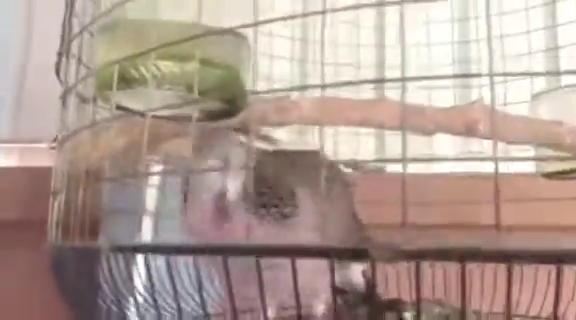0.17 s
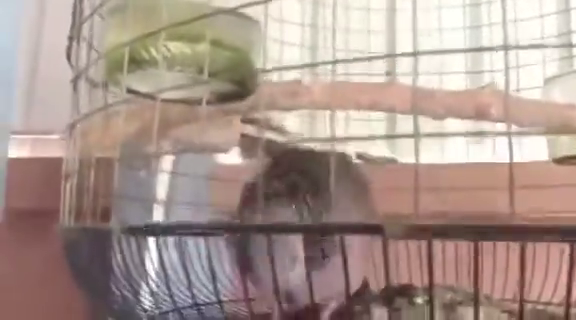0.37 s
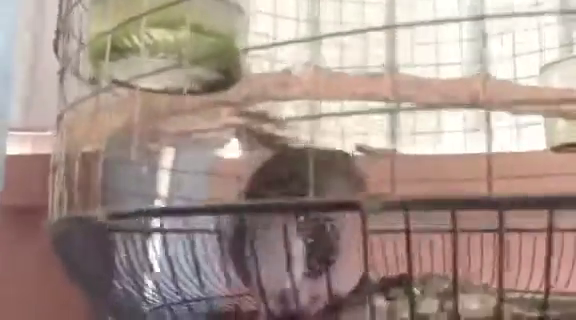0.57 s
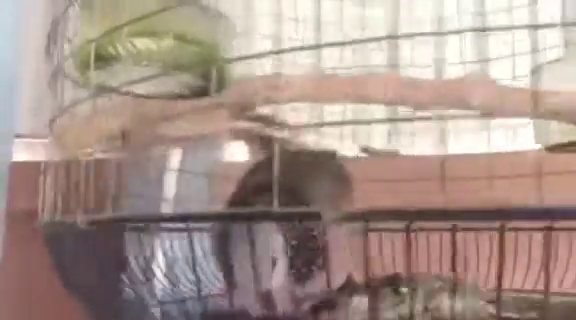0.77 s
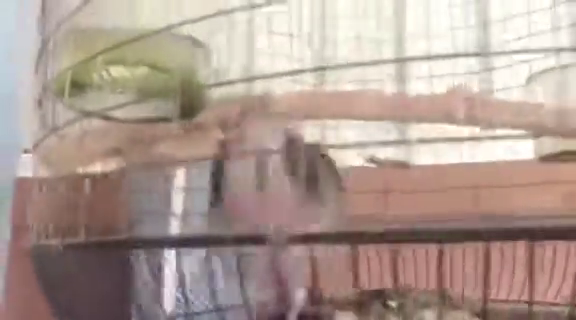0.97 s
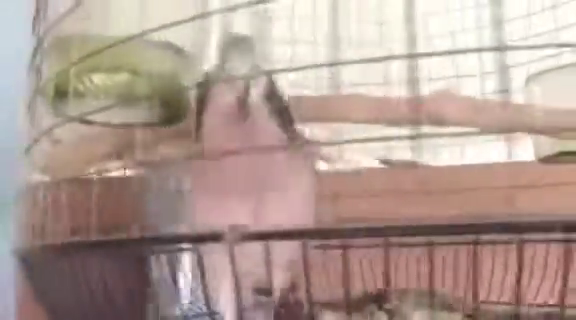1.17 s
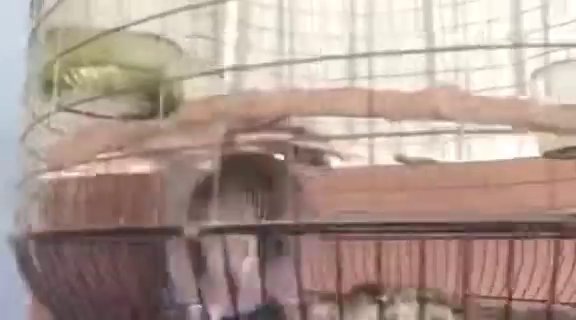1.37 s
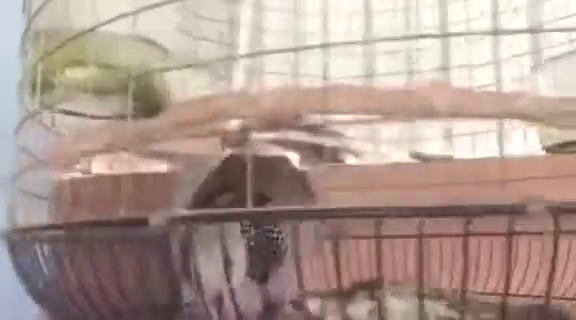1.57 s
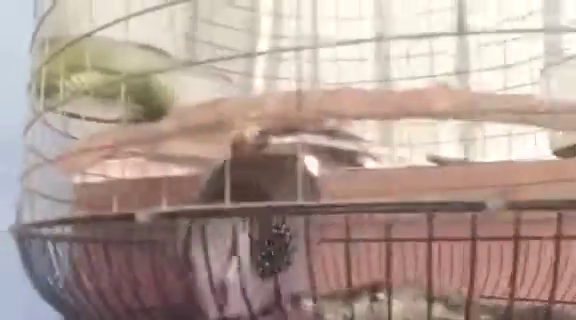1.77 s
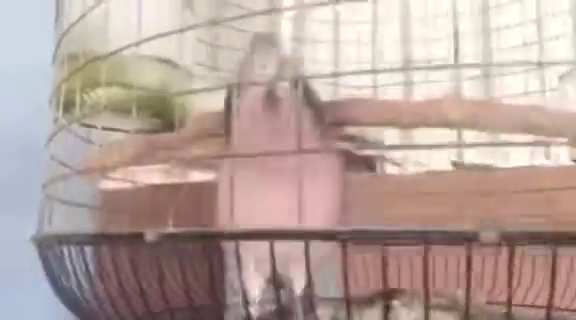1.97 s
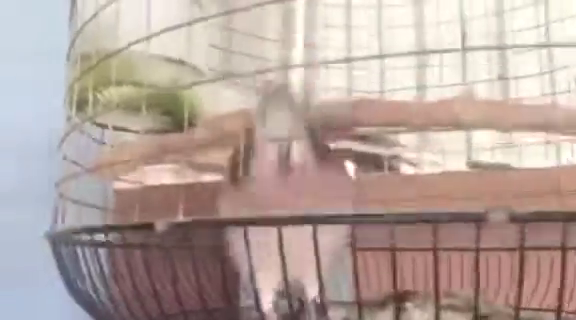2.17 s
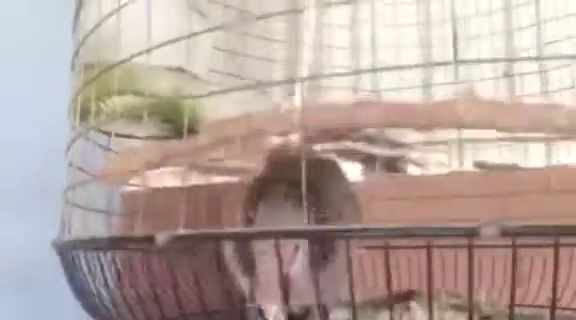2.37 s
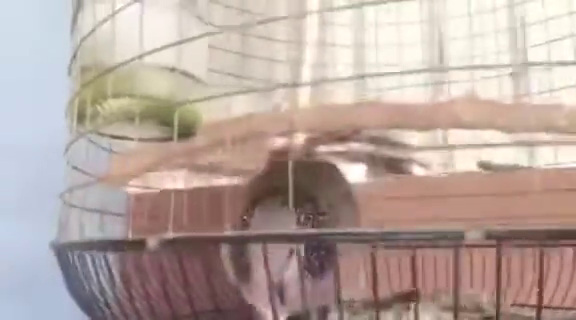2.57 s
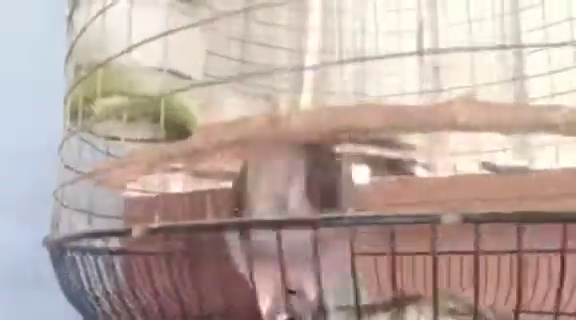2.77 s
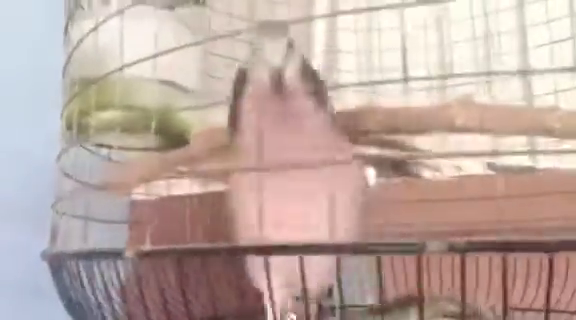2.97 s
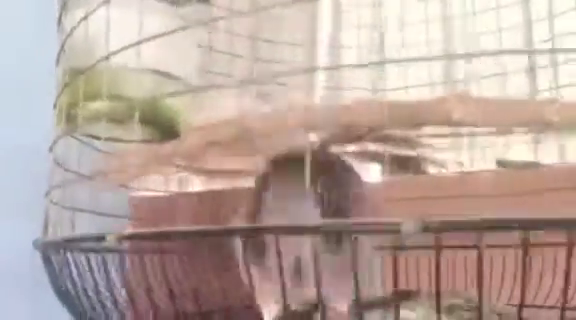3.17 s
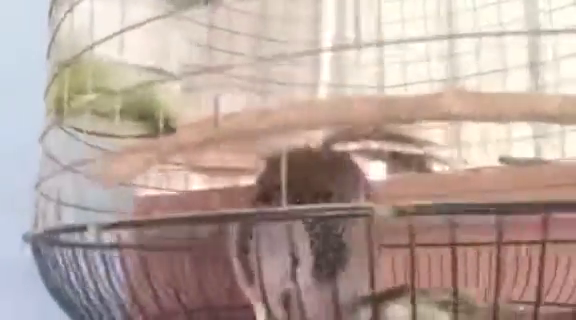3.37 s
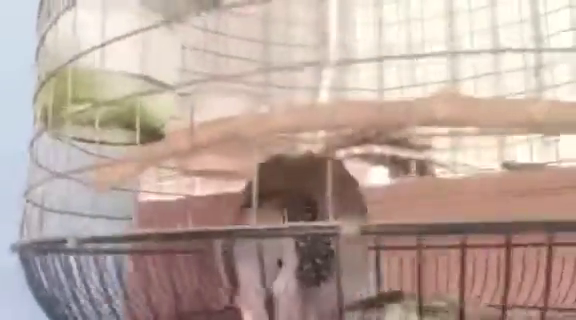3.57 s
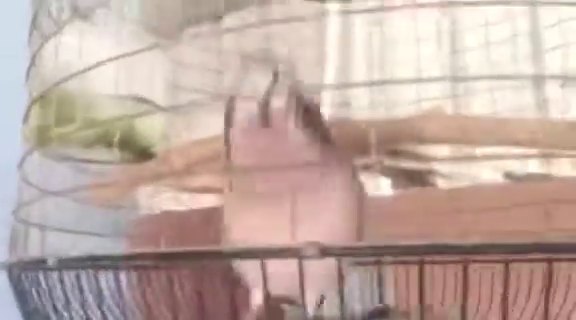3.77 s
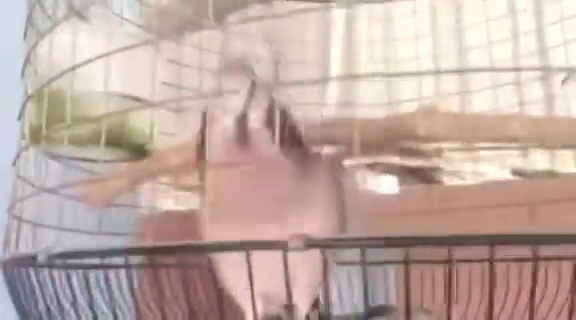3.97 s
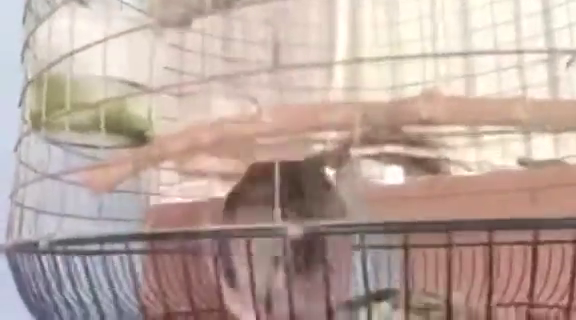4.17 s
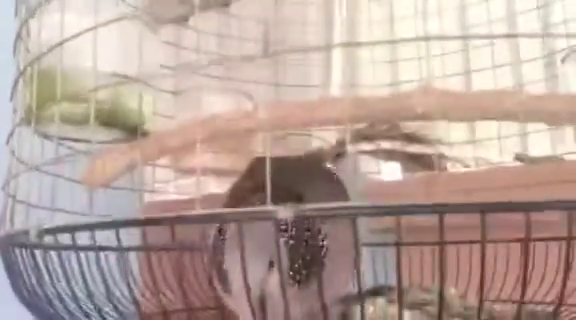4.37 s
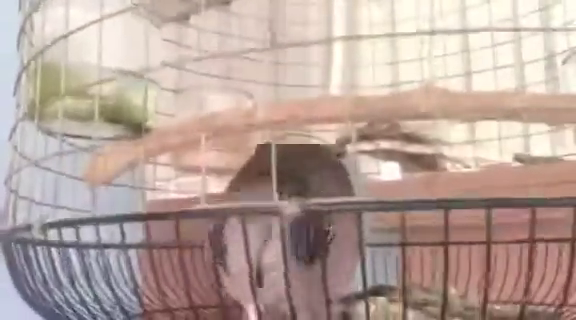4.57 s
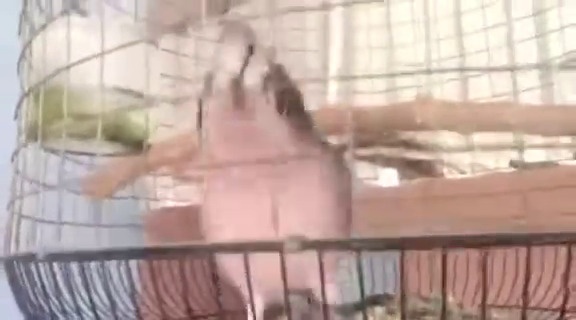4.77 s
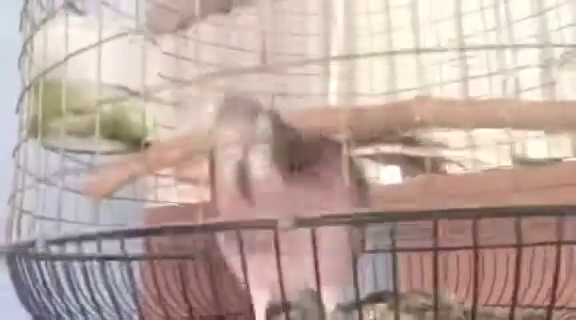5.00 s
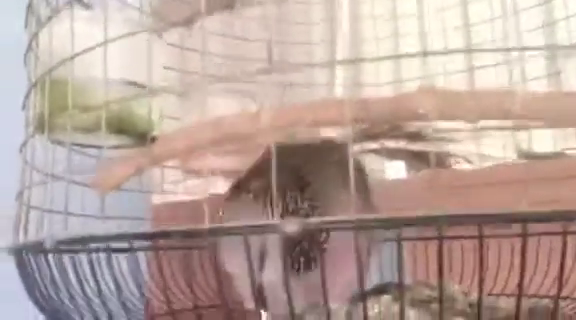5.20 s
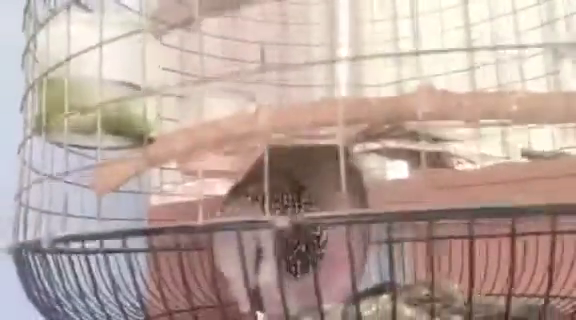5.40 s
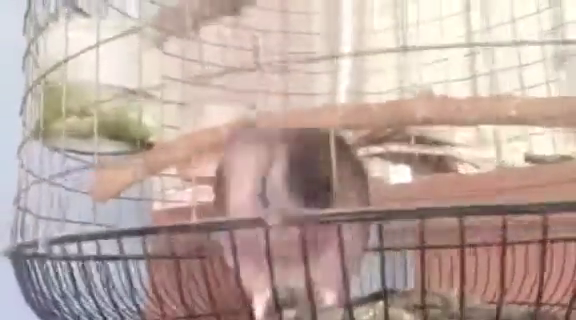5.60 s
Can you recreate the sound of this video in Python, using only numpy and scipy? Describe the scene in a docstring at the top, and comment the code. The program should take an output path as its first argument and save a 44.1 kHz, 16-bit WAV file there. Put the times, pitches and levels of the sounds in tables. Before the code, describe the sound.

Loud, hollow dove cooing repeats about once a second, with a second dove answering faintly, while engines pass softly outside.

```python
"""Over street rumble and hiss, a caged dove close by opens mid-coo as a slow motorbike engine passes outside.
Long held notes and short rolled ones alternate: in a roll the syrinx flutters in pulses that ring the crop;
in a hold one side sings far above the idling other. A second dove answers further off from the start.
Faint whines, valve ticks, cage scuffs, a low thump and a small bird's chirps follow as swept, rung or grainy
tones; late on, another engine revs up and pulls away as stacked multiples of its firing rate."""
import sys
import numpy as np
from scipy import signal
from scipy.io import wavfile
from scipy.ndimage import uniform_filter1d

SR = 44100
rng = np.random.default_rng(int(sys.argv[2]) if len(sys.argv) > 2 else 0)


def transcribe(signal):
    """Save signal, clipped to [-1, 1], as a 16-bit WAV file at the path in sys.argv[1]."""
    frames = np.atleast_2d(signal).T
    limited = np.clip(frames, -1, 1)
    pcm = np.round(limited * 32767).astype(np.int16)
    wavfile.write(sys.argv[1], SR, pcm)


N = 248724
T = np.arange(N) / SR

# street swells: (t/s, rumble level/dB, hiss level/dB, treble level/dB)
STREET_LEVELS = [(0.03, -34.5, -45.5, -45), (0.26, -32.5, -43, -58), (1.06, -42.5, -54.5, -62.5),
                 (1.27, -35.5, -50, -55), (1.95, -38, -61.5, -71.5), (2.22, -33.5, -53, -57),
                 (2.49, -38.5, -59, -67.5), (3.0, -44, -61.5, -63.5), (3.32, -38.5, -60.5, -64),
                 (3.44, -44.5, -67.5, -68.5), (3.91, -45.5, -69, -69), (4.03, -40, -60, -67.5),
                 (4.34, -36.5, -67, -65.5), (4.43, -40, -56.5, -66.5), (4.68, -45.5, -65.5, -68.5),
                 (5.04, -43, -56.5, -65.5), (5.58, -48.5, -66, -68.5)]
# relative spectra of rumble, mid hiss and treble: (f/Hz, level/dB per Hz)
RUMBLE_SPECTRUM = [(15, -41), (25, -16), (92, -4), (230, -8.5), (309, -15.5), (332, -27.5), (391, -12.5),
                   (420, -16.5), (550, -54.5), (920, -120)]
HISS_SPECTRUM = [(420, -33.5), (700, -8.5), (800, -14), (907, -9.5), (983, -0.5), (1490, -5), (2600, -18.5),
                 (3380, -48), (5720, -120)]
TREBLE_SPECTRUM = [(1290, -31.5), (2200, -3), (2790, -5.5), (3770, 0), (4960, -15), (5240, -6.5),
                   (8850, -14.5), (9470, -16.5), (12300, -54.5), (20800, -120)]
# long held notes: (start t/s, rolled lead-in t/s, hold t/s, pitch f/Hz, level/dB, lead-in level/dB,
# wheeze level/dB, wheeze sinks by f/Hz)
HELD_NOTES = [(-0.184, 0.08, 0.15, 602.4, -13.5, -16, -78, 446),
              (0.763, 0.081, 0.17, 603.9, -13.5, -15, -74, 443),
              (1.705, 0.075, 0.16, 601.6, -14, -14.5, -67.5, 409),
              (2.617, 0.081, 0.16, 601.8, -14, -14, -67, 300.1),
              (3.561, .078, .152, 599, -14.5, -13.5, -65, 473.6),
              (4.505, 0.071, .17, 596.2, -14.5, -17, -64.5, 602),
              (5.486, 0.11, 0.18, 591, -16.5, -14.5, -62.5, 451.8)]
# short rolled notes: (onset t/s, length t/s, flutter f/Hz, speeds up from t/s, until t/s, faster flutter f/Hz,
# level/dB, crop resonance f/Hz, half-rate lines level/dB)
ROLLED_NOTES = [(.501, .165, 86, .59, .635, 99, -18, 556, -9.5),
                (1.435, .17, 87.5, 1.505, 1.56, 100, -17, 553, -18),
                (2.356, .155, 86.6, 2.455, 2.485, 98, -17, 555, -12),
                (3.298, .17, 87.5, 3.375, 3.42, 99.5, -17, 545, -11),
                (4.242, .168, 86.5, 4.33, 4.35, 99.5, -18, 548, -14),
                (5.216, .172, 87.5, 5.325, 5.345, 99, -18, 542, -16)]
# passing motorbike: (t/s, firing rate f/Hz, boom level/dB, fifth multiple level/dB, roar level/dB)
BIKE_PASS = [(0.03, 28.3, -44.5, -44.5, -59), (0.29, 27.32, -34.5, -49, -41.5),
             (0.488, 26.84, -38.5, -57, -45), (0.616, 25.15, -42.5, -44, -48.5),
             (1.356, 24.8, -46.5, -41.5, -54.5), (1.508, 24.97, -60, -57.5, -58),
             (1.586, 24.08, -46.5, -55, -60.5), (1.8, 23.77, -55.5, -61.5, -58)]
# exhaust boom: (multiple of the firing rate, relative level/dB)
BIKE_MULTIPLES = [(2, -18.5), (3, 4), (4, -7.5), (7, -32.5), (8, -17.5), (9, -23.5), (10, -18.5)]
# relative spectrum of tyre and chain roar: (f/Hz, level/dB per Hz)
ROAR_SPECTRUM = [(1180, -36), (2000, 3), (3730, 5.5), (4970, -15.5), (5520, 0), (8700, -23), (9470, -34),
                 (12300, -57.5), (20800, -120)]
# valve ticks: (t/s, level/dB, ring f/Hz)
VALVE_TICKS = [(0.7891, -44.5, 3497), (0.8285, -41.5, 3620), (0.8694, -46, 3670), (0.9094, -53, 3310),
               (0.9537, -41.5, 3730), (0.9936, -47, 3650), (1.0301, -48.5, 3900), (1.0725, -46, 4160),
               (1.1134, -50, 4630), (1.1523, -49, 3700), (1.1927, -45, 4060), (1.2331, -42.5, 3686),
               (1.273, -42.5, 4106), (1.3144, -48, 4570), (1.3558, -49, 4265), (1.3972, -46, 3770),
               (1.4344, -47.5, 4750), (1.48, -50, 3410), (1.5165, -48, 3780), (1.5623, -52, 3380),
               (1.6057, -51, 4060), (1.6477, -53, 4050)]
# notes of the further dove: (start t/s, rise t/s, fall t/s, top f/Hz, level/dB, sinks by f/Hz,
# closing bend f/Hz)
FAR_NOTES = [(0.088, .13, 0.18, 618, -40, 61, 117), (.46, .01, 0.032, 563, -38, 5.6, 5.3),
             (0.697, .022, 0.03, 580, -44, 8.3, 4.5), (1.08, .17, .17, 625, -40.5, 45, 4.74),
             (1.63, .032, 0.037, 560, -44, 9.4, 56), (2.0, .056, .07, 591.9, -44, 30, 5.8),
             (2.15, .03, .1, 575, -53, 15, 5.5), (2.54, .049, .033, 616, -38, 7.8, 5.6),
             (2.88, .06, .14, 611, -34, 59, 80), (3.124, .02, 0.13, 578, -42.5, 28.7, 5),
             (3.5, .018, 0.021, 595.5, -38.5, 10.3, 90), (3.84, .08, .18, 618, -43, 73, 60),
             (4.145, .02, 0.049, 565.5, -41.5, 10.9, 5.4), (4.43, .032, .054, 561, -43.5, 11.4, 4.94),
             (4.88, .14, 0.17, 628.8, -40.5, 60, 4.6), (5.411, .058, .027, 589.3, -42, 6.3, 5.12)]
# runs of throbs in the further coo: (first t/s, length t/s, level/dB)
FAR_THROBS = [(0.243, .09, -26.5), (0.333, .085, -24), (1.187, .04, -36), (1.294, .085, -24),
              (2.086, .04, -31.5), (2.996, .13, -25), (3.931, .18, -23.5), (4.886, .04, -36.5),
              (5.06, .14, -23)]
# faint whines: (start t/s, end t/s, f/Hz, level/dB)
WHINE_TONES = [(0.323, 0.514, 996, -48.5), (0.905, 1.511, 1150, -59), (1.994, 2.409, 989, -55),
               (0.906, 1.539, 2430, -69.5), (4.0, 4.279, 1546, -70.5), (4.001, 4.698, 1703, -70)]
# claws and feathers on the cage: (t/s, level/dB, centre f/Hz, 60 dB decay t/s)
CAGE_SCUFFS = [(0.8904, -37.5, 6440, 0.14), (1.721, -48, 6550, 0.13), (2.201, -43.5, 6450, 0.14),
               (3.8076, -54.5, 6490, 0.19)]
# low thump: (t/s, level/dB, f/Hz, 60 dB decay t/s)
LOW_THUMP = [(2.099, -42.5, 156, 0.55)]
# small bird far off: (start t/s, loudest t/s, end t/s, from f/Hz, to f/Hz, level/dB)
BIRD_CHIRPS = [(2.725, 2.815, 2.84, 2940, 3160, -55), (2.735, 2.79, 2.87, 4400, 4330, -60),
               (2.795, 2.83, 2.9, 3680, 3450, -58), (2.825, 2.845, 2.975, 4030, 3870, -55),
               (2.84, 2.865, 2.95, 3050, 3000, -62)]
# engine pulling away: (t/s, firing rate f/Hz, level/dB of the 2nd, 4th, 5th, 8th and 10th multiple)
AWAY_REV = [(3.85, 23.2, -60, -67, -67, -69, -76), (3.878, 23.46, -61, -53, -53, -59, -64.5),
            (4.026, 25.05, -63, -43.5, -55, -56, -59), (4.09, 24.66, -50.5, -56, -51, -50, -56.5),
            (4.312, 27.03, -62.5, -43, -55, -50.5, -52.5), (4.48, 28.34, -50, -49.5, -43.5, -51.5, -53),
            (4.762, 28.8, -51, -58, -59, -55, -58.5), (4.968, 29.1, -46.5, -59, -54.5, -52, -50.5),
            (5.604, 29.19, -54.5, -62.5, -70, -53.5, -55.5), (5.62, 29.2, -58, -53, -62, -54, -73)]
# its weaker multiples: (multiple of the firing rate, level/dB against the 8th)
AWAY_MULTIPLES = [(3, -7.5), (6, -9.5), (7, -3.5), (9, -5.5)]

# lead-in: crop resonance, flutter rate and levels against the lead-in level
LEAD_FROM_HZ, LEAD_MID_HZ, LEAD_TO_HZ, LEAD_FLUTTER_HZ = 453, 548, 560, 87
LEAD_START_DB, LEAD_MID_DB, LEAD_HALF_DB = -19, -3.5, -12.5
# roll: the crop resonance slides up into the onset
SCOOP_S, SCOOP_HZ, SCOOP_DB = 0.01803, 130, -20
# it starts softer and slower, and slows at its end
ROLL_RISE_S, ROLL_RISE_DB, ROLL_EASE_HZ, ROLL_EASE_LATE_HZ = .025, -3, 4.9, 2
ROLL_LATE_DB, ROLL_RELEASE_S, ROLL_RELEASE_DB = -4.5, 0.016, -21.5
FLUTTER_ROUGH_HZ = 1.1  # scatter of the flutter rate
# scale of the crop's falloff from its centre, level of its skirts, and a weak upper throat band
CROP_WIDTH_HZ, CROP_SKIRT_DB, THROAT_HZ, THROAT_DB = 95.6, -21.5, 950, -39
# hold: the high side takes over; the low side idles roughly, one beat below it
SWITCH_S, IDLE_DB, IDLE_ROUGH_HZ, BEAT_HZ = 0.012, -24, 33.6, 87.1
SAG_HZ, DROP_HZ, KNEE = 18, 46.77, 0.68  # sag up to the knee (fraction of the hold), total drop at its end
SETTLE_DB, PUSH_DB = -3.5, -3  # level in mid hold and at its end
# tail: the high side glides down and out, the low side comes back above it and lingers
TAIL_S, TAIL_HZ, TAIL_DB, LINGER_DB = 0.045, 126.5, -23.5, -10.5
# while both sides sound: pitch scatter of each and of the pair, swing of the balance
ROUGH_HZ, DRIFT_HZ, ROUGH_DB = 5.5, 10, 1.5
LIMP = .45  # depth of the alternation between stronger and weaker beats
GLIDE_ROUGH_S = .008  # pitch scatter in Hz per Hz/s of glide
WHEEZE_HZ, WHEEZE_EARLY_S, WHEEZE_PEAK_S, WHEEZE_EDGE_DB = 6250, .03, 0.047, -11
TICK_RING_S = 0.0023
FAR_ROUGH_HZ = 28  # pitch scatter at full roughness
FAR_RISE_HZ_S, FAR_BEND_S, FAR_START_DB, FAR_END_DB, FAR_BEND_DB = 399, .04, 3, -2.5, -3
THROB_S, THROB_SAG_HZ_S = .047, 250  # spacing of the throbs, downward pitch bend within each
TOP_HZ = 9600


def undb(db):
    """Decibels to amplitude."""
    return 10 ** (np.asarray(db) / 20)


def unit(x):
    """Scale to rms 1."""
    return x / np.sqrt(np.mean(x ** 2))


def band(x, hz, width_hz):
    """Two-pole band-pass."""
    return signal.lfilter(*signal.iirpeak(hz, hz / width_hz, SR), x)


def band_noise(hz, width_hz, passes):
    """White noise through repeated band-passes; rms 1."""
    x = rng.standard_normal(N)
    for _ in range(passes):
        x = band(x, hz, width_hz)
    return unit(x)


def walk(rate):
    """Random levels held 1 / rate s and slewed twice; spread near 1."""
    k = int(SR / rate)
    steps = np.repeat(rng.standard_normal(N // k + 1), k)
    return 1.15 * uniform_filter1d(uniform_filter1d(steps, k), k)[:N]


def track(tables, column):
    """One column of all tables joined in time."""
    rows = np.array(sorted(row for table in tables for row in table))
    return np.interp(T, rows[:, 0], rows[:, column])


def loudness(tables, column, fade_db_s):
    """Gain from level curves that fade out beyond the ends of each table."""
    db = np.full(N, -200.)
    for table in map(np.array, tables):
        outside_s = np.abs(T - np.clip(T, table[0, 0], table[-1, 0]))
        curve = np.interp(T, table[:, 0], table[:, column])
        db = np.maximum(db, curve - fade_db_s * outside_s)
    return undb(db)


def turns(hz):
    """Running phase in radians of a moving pitch."""
    return 2 * np.pi * np.cumsum(hz) / SR


def noise(spectrum, swell_db, flicker_db):
    """Third-octave noise bands that swell together and flicker alone; rms 1."""
    hz, db = np.transpose(spectrum)
    out, swell = 0, walk(5.7)
    for f in hz[0] * 2 ** np.arange(0, np.log2(hz[-1] / hz[0]), 1 / 3):
        level_db = np.interp(np.log(f), np.log(hz), db)
        gain = undb(level_db + swell_db * swell + flicker_db * walk(40))
        out = out + gain * band(band(rng.standard_normal(N), f, f / 3), f, f / 3)
    return unit(out)


def husky(hz, rate):
    """A tone whose strength and phase scatter rate times a second: a narrow, grainy band; rms near 1."""
    phase = turns(hz)
    return walk(rate) * np.sin(phase) + walk(rate) * np.cos(phase)


def engine(phase, multiples, waver_db):
    """Multiples of the firing rate, each wavering on its own."""
    out = 0
    for k, db in multiples:
        gain = np.sqrt(2) * undb(db + waver_db * walk(5.9))
        out = out + gain * np.sin(k * phase + rng.uniform(0, 2 * np.pi))
    return out


def street():
    """Far traffic: rumble, mid hiss and a thin treble, each rising and falling."""
    rumble = undb(track([STREET_LEVELS], 1) - 4) * noise(RUMBLE_SPECTRUM, 0.21, 2.3)
    hiss = undb(track([STREET_LEVELS], 2)) * noise(HISS_SPECTRUM, 0.53, 3.6)
    treble = undb(track([STREET_LEVELS], 3) - 3.5) * noise(TREBLE_SPECTRUM, .3, 2)
    return rumble + hiss + treble


def lead_in(s, lead, _hold, hz, _db, db, *_):
    """Rows of the roll before a hold: the flutter speeds up until its sixth multiple meets the held pitch."""
    top = s + lead
    rows = [(s, LEAD_FLUTTER_HZ - 8, LEAD_FROM_HZ, db + LEAD_START_DB),
            (s + 0.42 * lead, LEAD_FLUTTER_HZ, LEAD_MID_HZ, db + LEAD_MID_DB),
            (top - 2 * SWITCH_S, LEAD_FLUTTER_HZ + 1.6, LEAD_TO_HZ, db - 2),
            (top - .003, hz / 6, hz - 20, db - 4),
            (top + SWITCH_S, hz / 6, hz, db - 25)]
    return [row + (LEAD_HALF_DB,) for row in rows]


def held(s, lead, hold, hz, db, *_):
    """Rows (s, low Hz, low dB, high Hz, high dB): the high side leads and sags, then a glide out."""
    top, end = s + lead, s + lead + hold
    idle_db = db + IDLE_DB

    def pair(t, high_hz, low_db, high_db):
        return t, high_hz - BEAT_HZ, low_db, high_hz, high_db

    return [pair(top - SWITCH_S, hz - 12, idle_db - 8, db - 15),
            pair(top + 0.0041, hz, idle_db + 4.5, db - 1),
            pair(top + 0.399 * hold, hz - 0.2 * SAG_HZ, idle_db, db + SETTLE_DB),
            pair(top + KNEE * hold, hz - SAG_HZ, idle_db, db + SETTLE_DB / 2),
            pair(end, hz - DROP_HZ, idle_db, db + PUSH_DB),
            (end + 0.1985 * TAIL_S, hz - 0.65 * DROP_HZ, db + LINGER_DB - 3,
             hz - DROP_HZ - 0.27 * TAIL_HZ, db + 0.31 * TAIL_DB),
            (end + TAIL_S, hz - .4 * DROP_HZ, db + 1.53 * LINGER_DB,
             hz - DROP_HZ - TAIL_HZ, db + TAIL_DB)]


def rolled(s, length, hz, quicken, quick, quick_hz, db, crop, half_db):
    """Rows (s, flutter Hz, crop Hz, dB, half-rate dB) of a short note: scoop, steady, faster, release."""
    end = s + length
    rows = [(s - SCOOP_S, hz - ROLL_EASE_HZ, crop - SCOOP_HZ, db + SCOOP_DB),
            (s, hz - ROLL_EASE_HZ, crop - 25, db + ROLL_RISE_DB),
            (s + ROLL_RISE_S, hz, crop, db),
            (quicken, hz + 1.2, crop, db),
            (quick, quick_hz, crop, db - 1.26),
            (end, quick_hz - ROLL_EASE_LATE_HZ, crop, db + ROLL_LATE_DB),
            (end + ROLL_RELEASE_S, quick_hz - 2 * ROLL_EASE_HZ, crop - 30, db + ROLL_RELEASE_DB)]
    return [row + (half_db,) for row in rows]


def flutter():
    """Multiples of the flutter rate and half-rate lines, rung by the crop; returns sound and gain."""
    notes = [lead_in(*row) for row in HELD_NOTES] + [rolled(*row) for row in ROLLED_NOTES]
    slew = SR // 150
    rate, crop, half_db = (uniform_filter1d(track(notes, k), slew) for k in (1, 2, 4))
    gain = uniform_filter1d(loudness(notes, 3, 2500), slew // 2)
    rate = rate + FLUTTER_ROUGH_HZ * walk(100)
    phase = turns(rate)
    half_gain = undb(np.minimum(half_db, -9) + 3 * walk(25))
    out = power = 0
    for k in np.arange(3.5, 12, .5):
        is_half = k % 1 > 0
        off = (k * rate - crop) / CROP_WIDTH_HZ
        throat = undb(THROAT_DB - 20 * ((k * rate - THROAT_HZ) / 220) ** 2 + 5 * walk(20))
        line = undb(-20 * off ** 4) + undb(CROP_SKIRT_DB - 4 * off ** 2) + throat
        line = line * (half_gain if is_half else 1) * undb(1.5 * walk(40))
        # the crop delays each line; half-rate lines wander most
        lag = 2 * np.arctan(1.5 * off) + (1.5 if is_half else .35) * walk(30)
        out = out + line * np.sin(k * phase - lag)
        power = power + line ** 2 / 2
    return gain * out / np.sqrt(power), gain


def hoarseness(hz):
    """Pitch scatter of a side that glides fast."""
    glide_hz_s = SR * np.abs(np.gradient(hz))
    return np.minimum(GLIDE_ROUGH_S * glide_hz_s, 25) * walk(120)


def syrinx():
    """Two near-pure tones with weak octaves, beating and mixing; returns sound, gains and overlap."""
    # muscles need a few ms to change pitch or pressure
    slew = SR // 200
    notes = [held(*row) for row in HELD_NOTES]
    low_hz, high_hz = (uniform_filter1d(track(notes, k), slew) for k in (1, 3))
    low_gain, high_gain = (uniform_filter1d(loudness(notes, k, 2500), slew) for k in (2, 4))
    both = np.minimum(2.5 * low_gain / (low_gain + high_gain), 1) ** 2  # 1 in a tail, near 0 in a hold
    drift_hz = DRIFT_HZ * both * walk(60)
    low_rough_hz = (ROUGH_HZ * both + IDLE_ROUGH_HZ * (1 - both)) * walk(110)
    low_phase = turns(low_hz + drift_hz + hoarseness(low_hz) + low_rough_hz)
    shaky_hz = high_hz * (1 + 0.0054 * (1 - both) * walk(53))
    high_phase = turns(shaky_hz + drift_hz + hoarseness(high_hz) + ROUGH_HZ * both * walk(110))
    swing = undb(ROUGH_DB * both * walk(30))
    low_gain, high_gain = low_gain / swing, high_gain * swing
    # a half-beat sine sets alternate beats stronger and weaker
    limp_depth = LIMP * (.25 + .75 * both) * np.tanh(1 + walk(14))
    limp = 1 + limp_depth * np.sin((high_phase - low_phase) / 2)
    blur = 2.2 * walk(150)  # the octave leaks unevenly
    low = (np.sin(low_phase) + undb(-40) * np.sin(2 * low_phase + blur)) * undb(1.1 * walk(80))
    high = (np.sin(high_phase) + undb(-49) * np.sin(2 * high_phase + blur)) * undb(.6 * walk(80))
    # the two sides mix in the windpipe and leave tones one beat above and below the pair
    above = undb(-19) * np.sin(2 * high_phase - low_phase)
    below = undb(-21) * np.sin(2 * low_phase - high_phase)
    mixed = (above + below) * np.minimum(low_gain, high_gain)
    tones = np.sqrt(2) * limp * (low * low_gain + high * high_gain + mixed)
    return tones, low_gain, high_gain, both


def dove():
    """Fluttering rolls and syrinx tones with air rasping in the crop, smeared by nearby walls."""
    roll, roll_gain = flutter()
    tones, low_gain, high_gain, both = syrinx()
    rasp_gain = undb(-19) * roll_gain + undb(-22) * low_gain + undb(-36.5) * high_gain
    rasp = band_noise(480, 270, 3) * rasp_gain
    dry_edge = undb(-31.5) * band_noise(820, 99, 2) * low_gain * both
    coo = roll + tones + rasp + dry_edge
    # nearby walls return a short smear
    tail = rng.standard_normal(SR // 4) * undb(-60 * T[:SR // 4] / 0.16)
    tail = tail / np.sqrt(np.sum(tail ** 2))
    return coo + undb(-9.5) * signal.fftconvolve(coo, tail)[:N]


def wheeze_note(s, lead, hold, _hz, _db, _lead_db, db, sink_hz):
    """Rows (s, Hz, dB) of the thin nostril whistle under a hold."""
    top = s + lead
    return [(top - WHEEZE_EARLY_S, WHEEZE_HZ, db + WHEEZE_EDGE_DB),
            (top + WHEEZE_PEAK_S, WHEEZE_HZ - 0.25 * sink_hz, db),
            (top + 0.72 * hold, WHEEZE_HZ - 0.83 * sink_hz, db + 0.5),
            (top + hold, WHEEZE_HZ - sink_hz, db + WHEEZE_EDGE_DB)]


def wheeze():
    """Two thin, fluttering whistles that sink with the note."""
    notes = [wheeze_note(*row) for row in HELD_NOTES]
    phase = turns(track(notes, 1) + 35 * walk(400))
    lower = np.sin(phase) * undb(3.3 * walk(70))
    upper = np.sin(1.3 * phase) * undb(-13.5 + 4.4 * walk(25))
    return np.sqrt(2) * (lower + upper) * loudness(notes, 2, 600)


def valve_ticks():
    """Short knocks that ring the engine cover at a different pitch each time."""
    out = np.zeros(N)
    for s, db, hz in VALVE_TICKS:
        age = np.clip(T - s, 0, None)
        ring = np.sin(2 * np.pi * hz * age) + 0.38 * np.sin(2 * np.pi * 1.3 * hz * age)
        envelope = (age / TICK_RING_S) * np.exp(1 - age / TICK_RING_S)
        out += undb(db - 3) * ring * envelope
    return out


def motorbike():
    """Exhaust boom on multiples of the firing rate, tyre and chain roar, and valve ticks."""
    phase = turns(track([BIKE_PASS], 1))
    boom = engine(phase, BIKE_MULTIPLES, 1.8) * loudness([BIKE_PASS], 2, 60)
    fifth = np.sqrt(2) * np.sin(5 * phase) * loudness([BIKE_PASS], 3, 60)
    roar = loudness([BIKE_PASS], 4, 40) * undb(-4) * noise(ROAR_SPECTRUM, .3, 1.5)
    return boom + fifth + roar + valve_ticks()


def far_note(s, rise, fall, hz, db, sink_hz, bend_hz):
    """Rows (s, Hz, dB, roughness): the pitch climbs rolling to its top, sags clear, then bends down."""
    end = s + rise + fall
    bend_s = FAR_BEND_S * min(bend_hz / 50, 1)
    return [(s, hz - FAR_RISE_HZ_S * rise, db + FAR_START_DB, 1),
            (s + rise, hz, db, .12),
            (end, hz - sink_hz, db + FAR_END_DB, .12),
            (end + bend_s, hz - sink_hz - bend_hz, db + FAR_BEND_DB, .3)]


def far_dove():
    """A distant coo that throbs; echoes, as a band of noise, blur its tone."""
    notes = [far_note(*row) for row in FAR_NOTES]
    hz = track(notes, 1) * (1 + .01 * walk(40)) + FAR_ROUGH_HZ * track(notes, 3) * walk(90)
    smear = band_noise(550, 170, 2)
    base = loudness(notes, 2, 340) * undb(2 * walk(28))  # it breaks up
    gain = np.sqrt(2) * base * undb(2 * walk(42))
    for s, length, db in FAR_THROBS:
        repeats = max(round(length / THROB_S) - 1, 0)
        age = np.clip(T - s, 0, None)
        age -= THROB_S * np.minimum(age // THROB_S, repeats)  # restart the clock at each throb
        inside = (age > 0) & (age < THROB_S)
        hz = hz - THROB_SAG_HZ_S * (age - THROB_S / 2) * inside
        # each throb opens fast, holds, then closes
        throb = np.minimum(age / .009, 1) * undb(db - 1.5 - 5 * (age / .038) ** 3)
        gain = np.maximum(gain, throb)
    slew = SR // 400
    gain = uniform_filter1d(gain, slew)
    tone = gain * np.sin(turns(uniform_filter1d(hz, slew)))
    coo = tone + (undb(-3) * base + undb(-21) * gain) * smear
    return band(band(coo, 570, 340), 570, 340)  # the closed crop passes one band


def whine():
    """Narrow, broken tones that come and go."""
    out = 0
    for start, end, hz, db in WHINE_TONES:
        out = out + husky(np.full(N, 1. * hz), 130) * loudness([[(start, db), (end, db)]], 1, 88)
    return out


def scuffs():
    """Claws and feathers on the cage: dry, grainy rustles with a quick rise."""
    out = np.zeros(N)
    for s, db, hz, t60 in CAGE_SCUFFS:
        age = np.clip(T - s + .008, 0, None)
        grain = band_noise(hz, 4100, 1) * undb(3.5 * walk(630))
        out += np.minimum(age / 0.015, 1) * undb(db - 7 - 60 * age / t60) * grain
    return out


def thump():
    """One dull knock ringing low."""
    s, db, hz, t60 = LOW_THUMP[0]
    age = np.clip(T - s, 0, None)
    return np.minimum(age / 0.0093, 1) * undb(db - 60 * age / t60) * np.sin(2 * np.pi * hz * age)


def chirp():
    """A small bird's husky gliding notes, blurred by distance."""
    out = 0
    for start, crest, end, from_hz, to_hz, db in BIRD_CHIRPS:
        rows = [[(start, from_hz, db - 11), (crest, max(from_hz, to_hz), db), (end, to_hz, db - 11)]]
        out = out + husky(track(rows, 1), 550) * loudness(rows, 2, 300)
    return out * undb(1.5)


def away():
    """An engine revving up; its strongest multiples take turns as it moves off."""
    phase = turns(track([AWAY_REV], 1))
    strong = 0
    for column, k in enumerate((2, 4, 5, 8, 10), 2):
        strong = strong + engine(phase, [(k, 0)], 1.2) * loudness([AWAY_REV], column, 60)
    weak = engine(phase, AWAY_MULTIPLES, 3) * loudness([AWAY_REV], 5, 60)
    return strong + weak


def scene():
    """Sum birds, engines and street into one channel."""
    birds = dove() + wheeze() + far_dove() + scuffs() + chirp()
    outside = street() + motorbike() + whine() + thump() + away()
    return (birds + outside)[None]


def record(dry):
    """The phone cuts the top with a steep low-pass."""
    low_pass = signal.ellip(10, .2, 80, TOP_HZ, fs=SR, output="sos")
    return signal.sosfilt(low_pass, dry)


dry = scene()
out = record(dry)
transcribe(out)
```